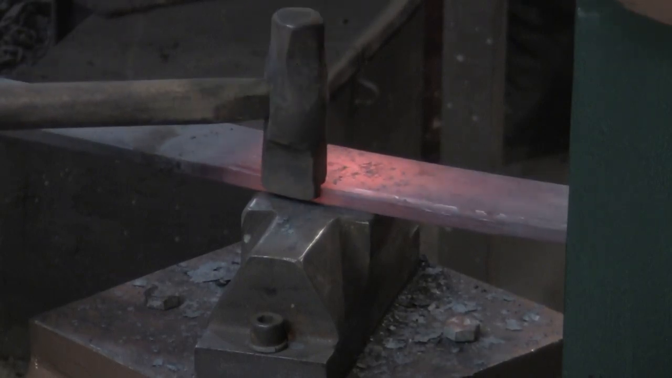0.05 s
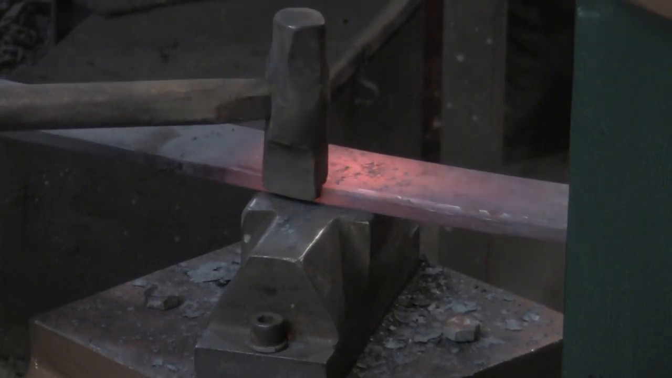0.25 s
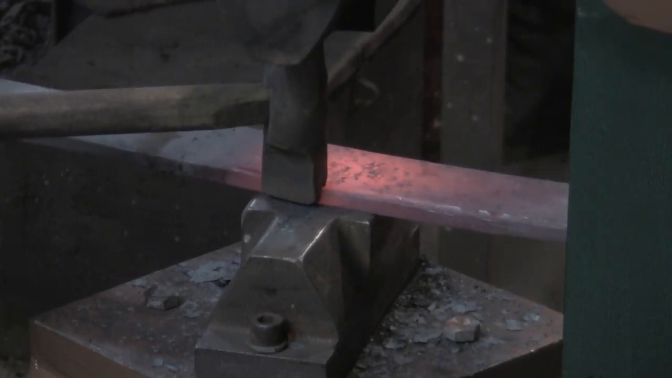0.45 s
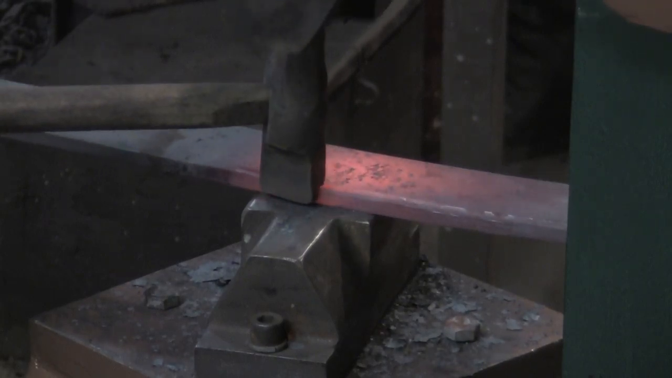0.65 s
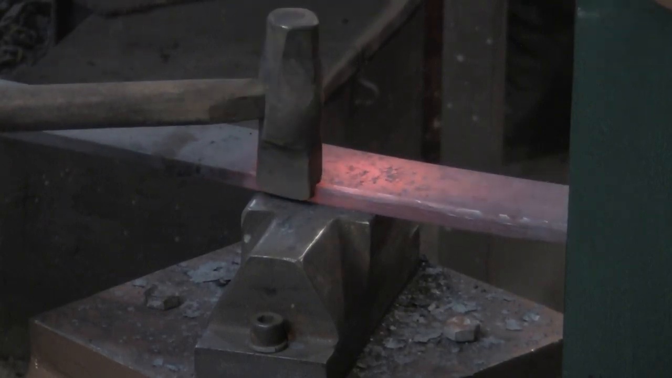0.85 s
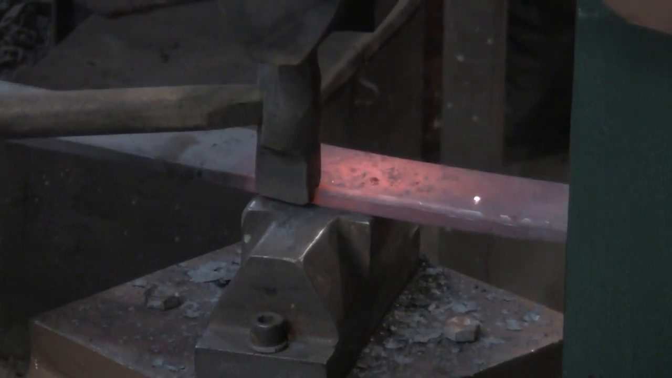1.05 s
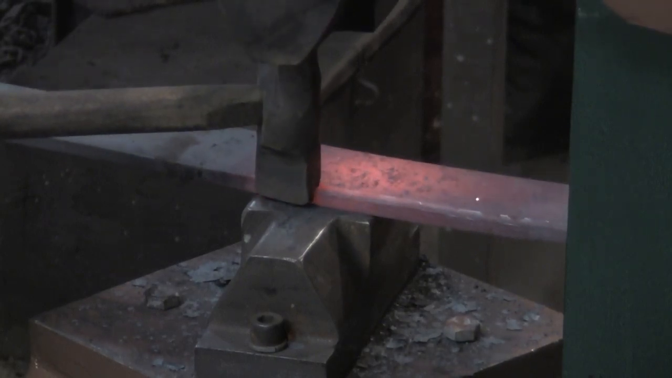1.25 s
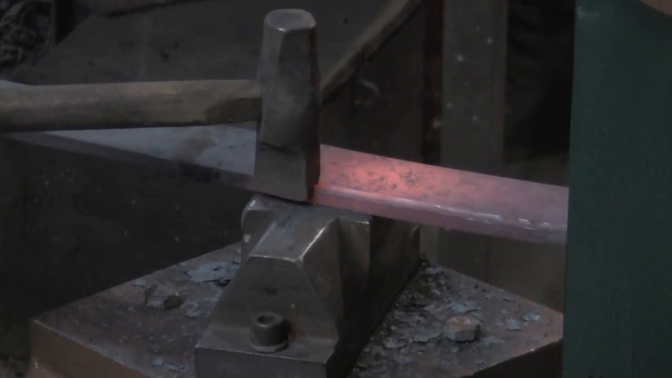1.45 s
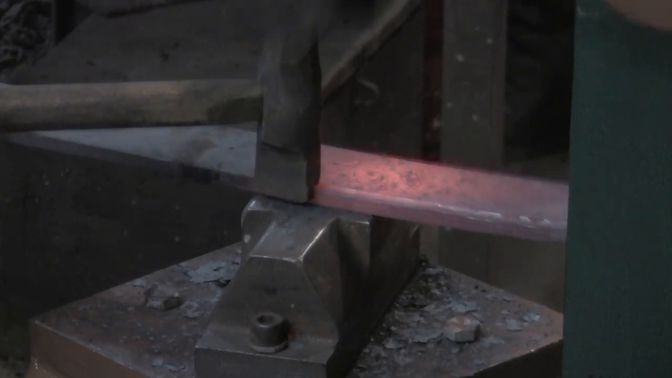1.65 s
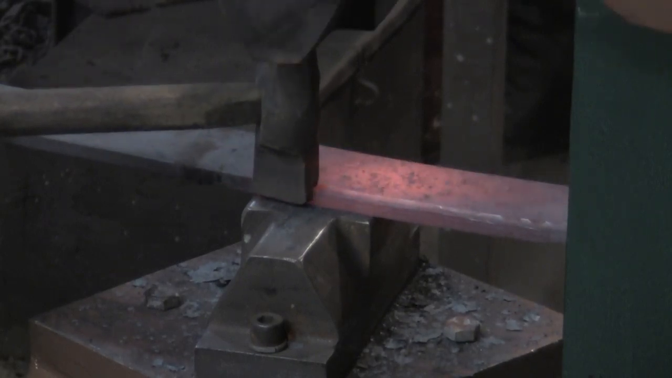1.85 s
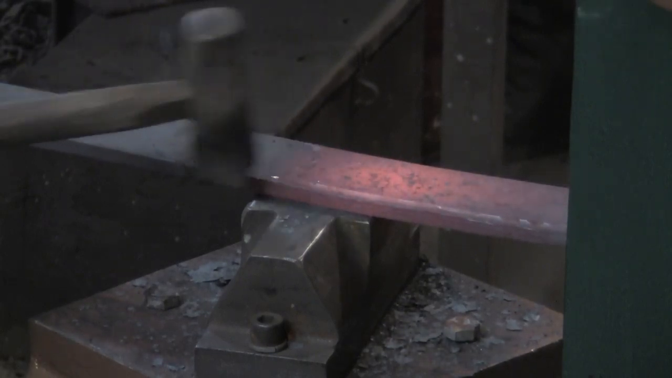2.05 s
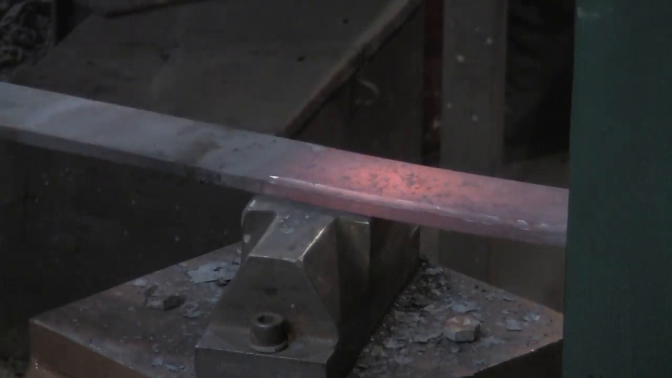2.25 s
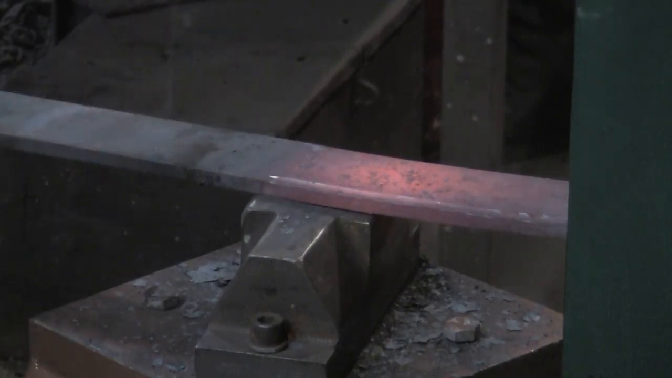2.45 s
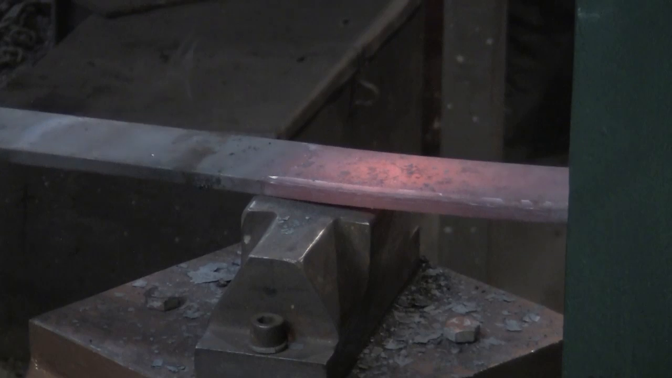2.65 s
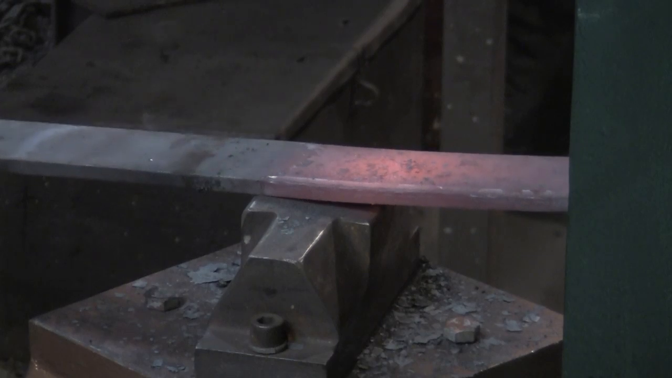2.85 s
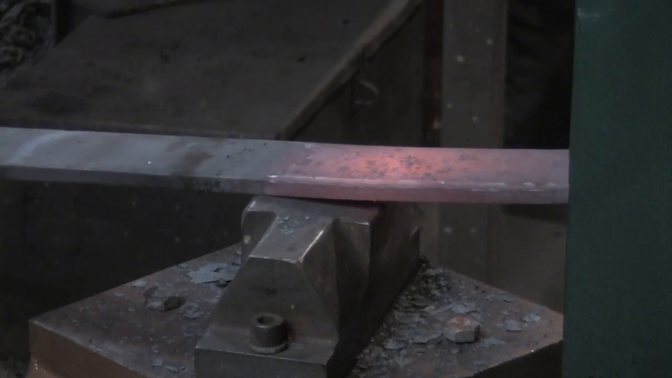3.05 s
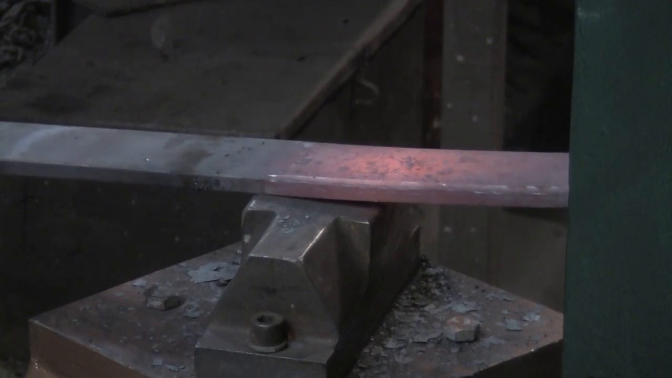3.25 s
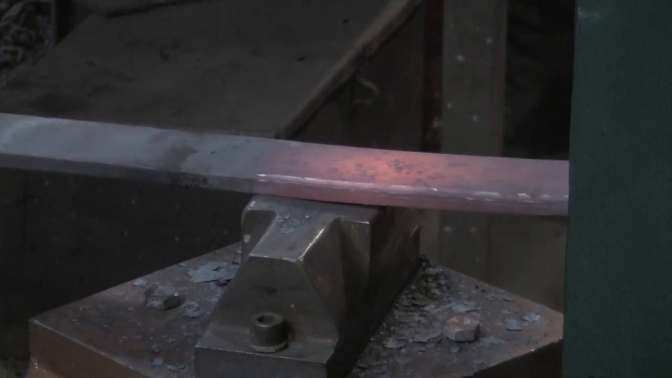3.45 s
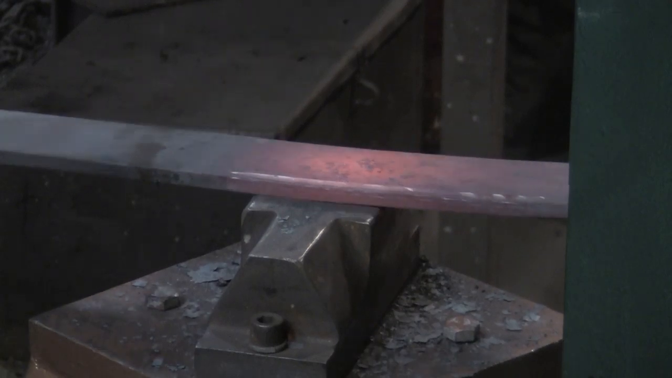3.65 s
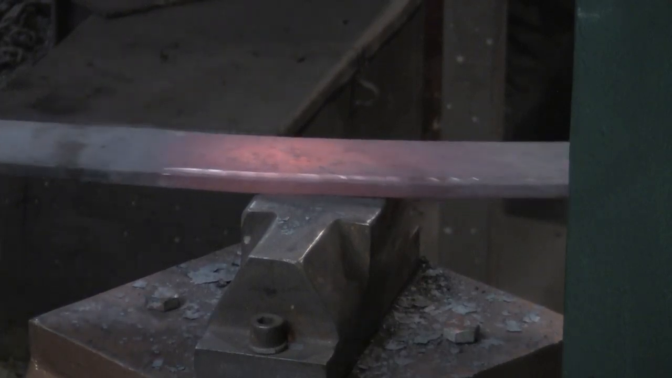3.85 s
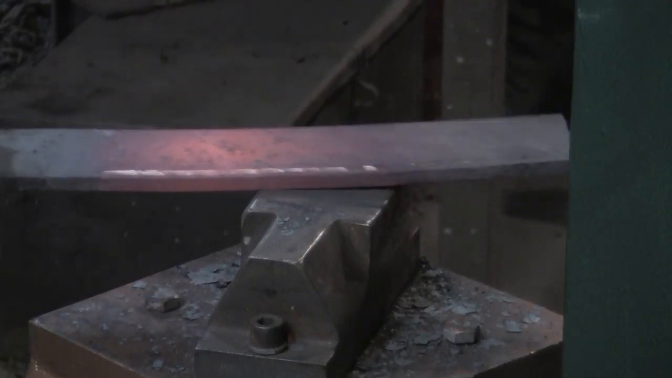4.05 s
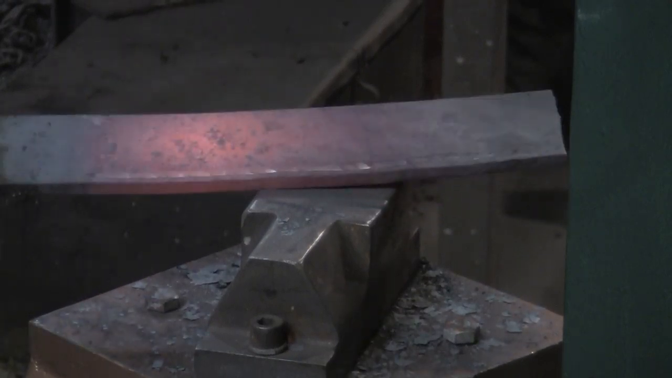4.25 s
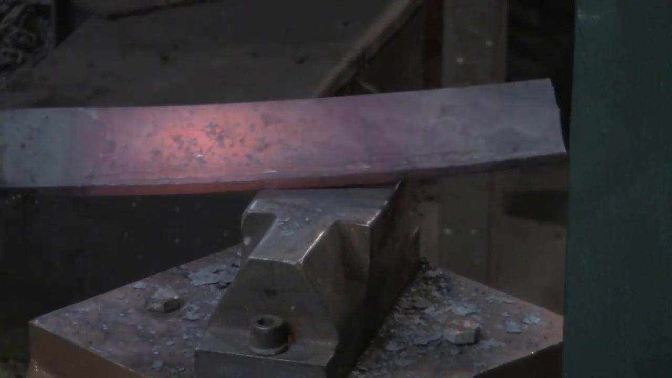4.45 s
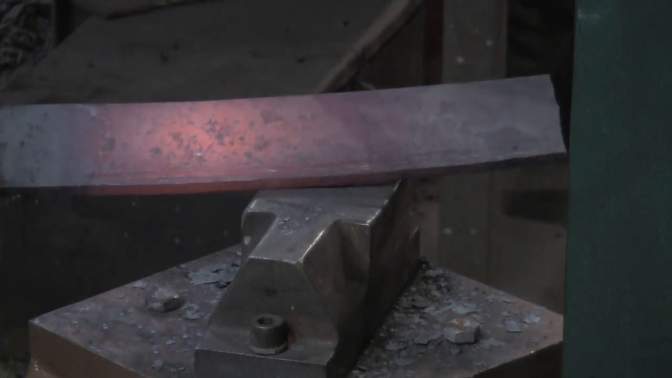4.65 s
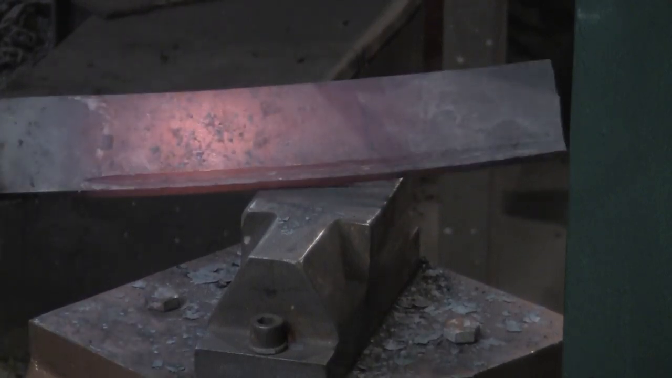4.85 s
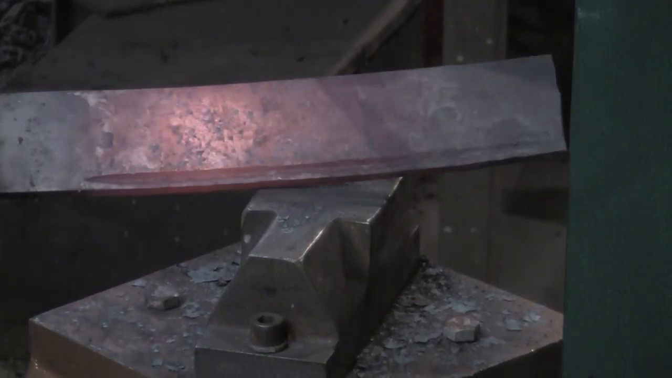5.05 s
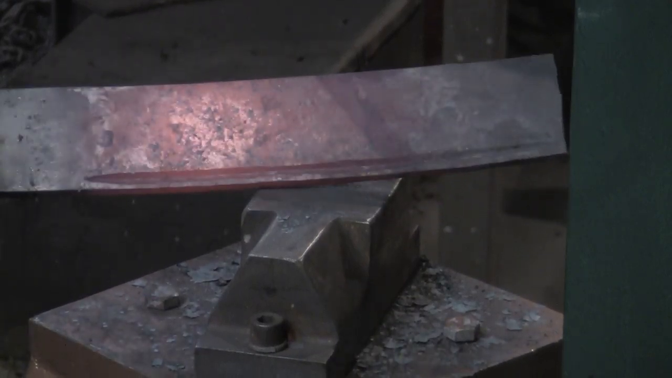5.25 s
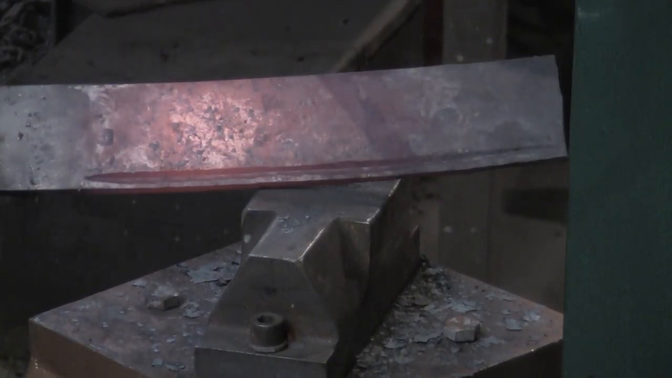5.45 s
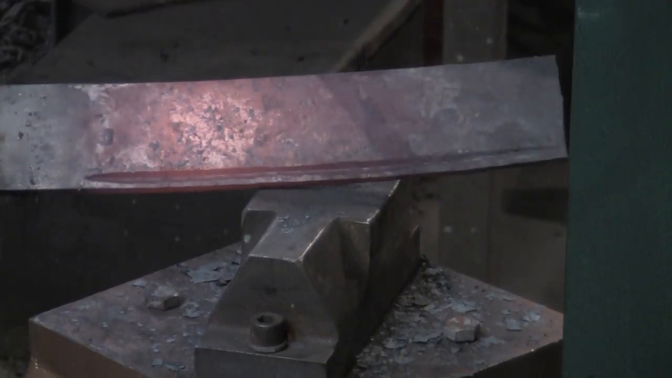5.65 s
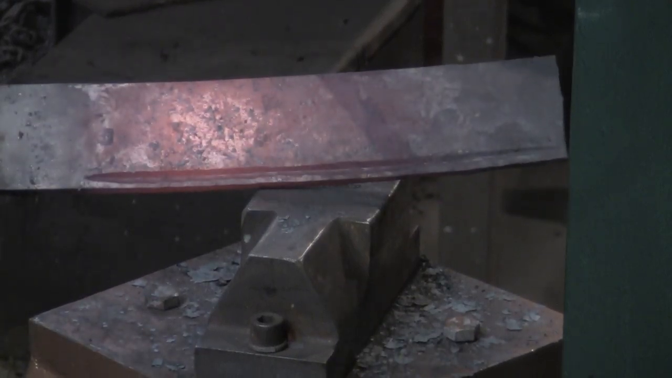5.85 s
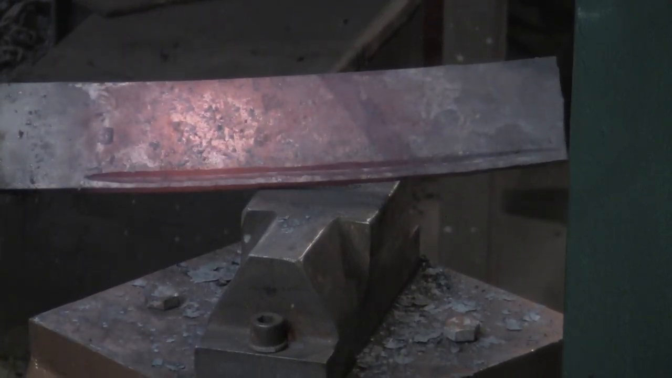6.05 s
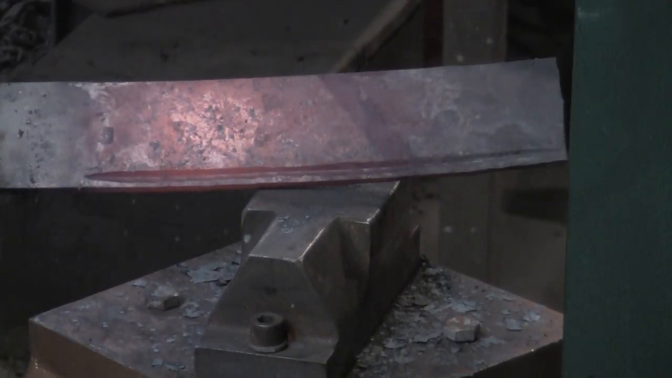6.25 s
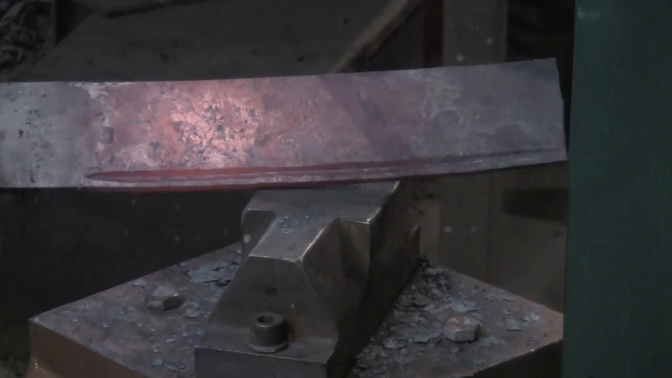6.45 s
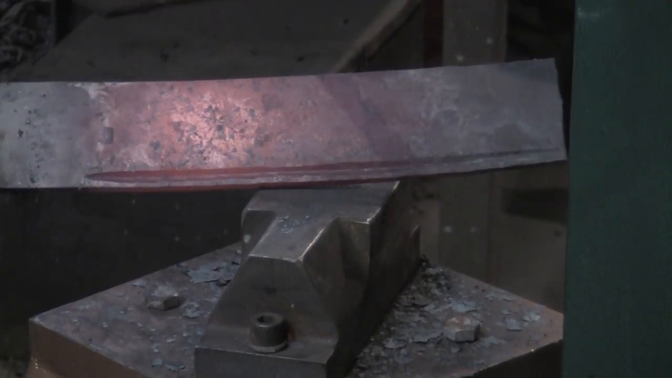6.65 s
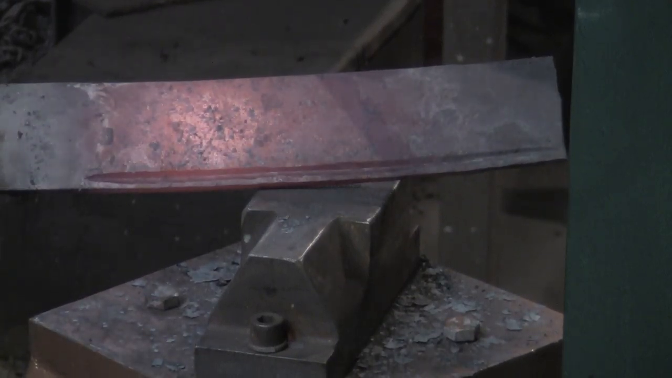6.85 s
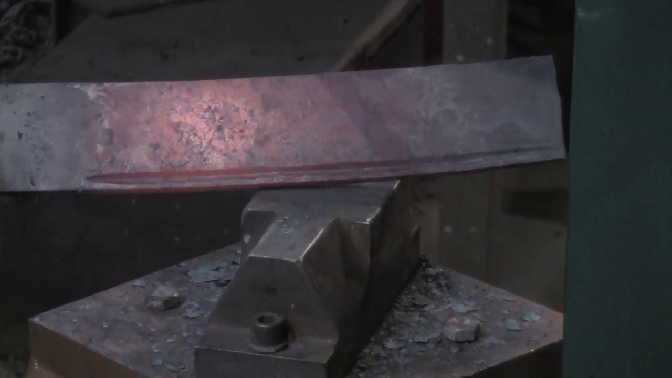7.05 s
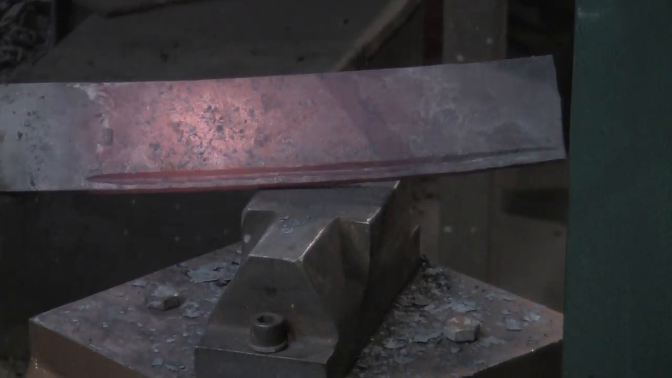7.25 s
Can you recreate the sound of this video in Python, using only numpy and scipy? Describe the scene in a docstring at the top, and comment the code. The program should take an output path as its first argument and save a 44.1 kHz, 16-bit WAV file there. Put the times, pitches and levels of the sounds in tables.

```python
"""An air hammer drives a hand-held set tool into hot steel in a large hard-walled shop: each blow is a contact
crack, a cluster of decaying modes and a noise crash; valve air, a gated noise jet, hisses around the strokes.
The tool is laid down and a steel piece clangs, with short dull rings for valve clunks, bounces and late ticks;
the bar rasps over the die as random grains excite its resonances. The walls add a diffuse echo; a forge blower
hums throughout as roar, duct and blade tone. A limiter pulls down the loud hits; the ending is faded."""
import sys
import numpy as np
from scipy import signal
from scipy.fft import rfft, irfft
from scipy.io import wavfile

SR = 44100
rng = np.random.default_rng(int(sys.argv[2]) if len(sys.argv) > 2 else 0)


def wrap_up_sound(samples):
    """Save the sound to the file named by the first command line argument, as 16-bit audio."""
    columns = np.atleast_2d(samples).T
    # keep every value between -1 and 1, then stretch to whole-number steps
    tamed = np.clip(columns, -1, 1)
    steps = np.round(tamed * 32767).astype(np.int16)
    wavfile.write(sys.argv[1], SR, steps)


N = 321930
LEAD = SR // 2   # samples computed ahead of t = 0, so that earlier sounds can still decay into the scene
LONG = N + LEAD

# All levels are relative, inside their own source.
# Ram on tool: t/s, level/dB; the first blow falls before t = 0 and only its decay is heard
RAM_BLOWS = [(-.283, 7), (0.3963, 12.5), (1.0744, 13), (1.7558, 15)]
# Modes of tool, die and frame: f/Hz, level/dB, t60/s (before the common limit)
FRAME_MODES = [(375, -17.5, 0.21), (1085, -30, 0.17), (1788, -6.5, 0.25), (1820, -16, 0.12),
               (1934, -10, 0.4), (2600, -27, 0.14), (3780, -37.5, .3)]
# Spectral density of the blow's crash: f/Hz, level/dB per Hz
BLOW_CRASH_SPECTRUM = [(120, -19), (250, -4.5), (400, -12), (820, -5), (1300, -9.5), (1850, -8),
                       (2300, -14.5), (4000, -13.5), (4800, -21.5), (9700, -24), (11200, -76),
                       (22000, -120)]
# Partials of the ram's first contact: f/Hz, level/dB, t60/s, delay/s
RAM_CONTACT_PARTIALS = [(3970, -5.5, 0.0092, 0.0003), (3870, -12, 0.016, 0.00036),
                        (5170, -2, 0.009, 0.0031), (2640, 1.5, 0.016, 0.0071), (314, 3, 0.036, 0.0022),
                        (1430, -11, 0.011, 0.00019)]
# Exhaust as the ram lifts again: t/s, level/dB at onset, held/s
EXHAUST_PUFFS = [(-.002, -8, 0.0053), (0.688, -12, 0.023), (1.365, -8.5, 0.015), (1.956, -5.5, 0.014)]
# Spectral density of the air jet: f/Hz, level/dB per Hz
AIR_SPECTRUM = [(880, -20), (1500, -15), (1890, -5.5), (2150, -12.5), (2350, -3.5), (2830, -13),
                (7160, -12.5), (9520, -8.5), (12200, -19), (13500, -39)]
# Whistles in the ports: f/Hz, width/Hz, level/dB
PORT_WHISTLES = [(8930, 110, -11.5), (9330, 99, -16), (9770, 60, -7.5), (9340, 90, -9.5), (10100, 61, -22)]
# Tool put down: t/s, level/dB
TOOL_LANDINGS = [(2.2305, 4)]
# Modes of what the tool lands on: f/Hz, level/dB, t60/s (before the common limit)
BENCH_MODES = [(757, -22, 0.25), (824, -19, 0.3), (1032, -22, 0.31), (1300, -25, 0.26), (1510, -14, 0.33),
               (1675, -19, .25), (2130, -27, 0.25), (2420, -31, 0.1)]
# Spectral density of the landing's crash: f/Hz, level/dB per Hz
BENCH_CRASH_SPECTRUM = [(180, -48), (350, -14), (750, -0.5), (1100, -3), (1600, 0.5), (2100, -9),
                        (4000, -21.5), (9400, -29), (11200, -97), (22000, -120)]
# Partials of the tool's first contact: f/Hz, level/dB, t60/s, delay/s
BENCH_CONTACT_PARTIALS = [(1522, 10, 0.033, 0.0012), (3860, -10, 0.0088, 0), (820, -3, 0.018, 0.028)]
# Steel dropped on steel: t/s, level/dB
CLANGS = [(2.8737, 7)]
# Modes of the dropped piece: f/Hz, level/dB, t60/s (before the common limit)
PIECE_MODES = [(418.7, -8.5, 0.48), (580, -18, 0.4), (676, -17, 0.61), (748, -10.5, 0.46), (902, -15, 0.55),
               (960, -24, 0.37), (1250, -9, 0.53), (1358, -14, 0.48), (1623, -7.5, 0.53), (1851, -7, 0.25),
               (2036, -12, 0.27), (2140, -13.5, 0.29), (2484, -11, 0.54), (2655, -10, 0.16),
               (2783, -11, 0.41), (2897, -8, 0.26), (3262, -23, .3), (3700, -21.5, 0.23),
               (3970, -14.5, 0.24), (7200, -37, 0.5)]
# Spectral density of the clang's crash: f/Hz, level/dB per Hz
PIECE_CRASH_SPECTRUM = [(150, -59), (250, -9), (415, -6.5), (535, -4.5), (722, -5), (1060, -3.5),
                        (2690, -12.5), (10000, -32.5), (11000, -91), (14300, -121), (22000, -120)]
# Partials of the piece's first contact: f/Hz, level/dB, t60/s, delay/s
PIECE_CONTACT_PARTIALS = [(3020, -7, 0.0089, 0.0014), (5900, -14, 0.0039, 0), (1195, 1, 0.031, 0.00066)]
# Small knocks: valve clunks, bounces of the laid tool and dropped piece, late ticks: t/s, level/dB, f/Hz
SMALL_KNOCKS = [(0.303, -15.5, 1220), (0.588, -16, 1710), (0.966, -21, 1200), (1.660, -12.5, 780),
                (1.954, -4, 217), (2.281, 3.5, 804), (2.92, -10, 416), (3.972, -49, 3900),
                (4.274, -31, 9100)]
# Resonances of the sliding bar: f/Hz, width/Hz, level/dB
BAR_RESONANCES = [(1860, 60, 6.5), (2540, 80, 2.5), (3220, 150, 6), (3930, 60, 5.5), (4710, 87, -2),
                  (5410, 61, -3), (6100, 70, -8), (6720, 70, -8), (7900, 150, -3), (8880, 90, -1),
                  (9700, 150, -8.5)]
# Reverberation time of the shop: f/Hz, t60/s
SHOP_DECAY = [(100, 0.5), (500, 0.81), (2000, 0.84), (5000, 0.61), (10000, 0.23)]
# Stereo width of echo and blower: f/Hz, level/dB of side over mid
SIDE_OVER_MID = [(60, -30), (180, -20), (520, -15.5), (1520, -15), (4470, -10), (13200, -1)]
# Spectral density of the blower's roar: f/Hz, level/dB per Hz
ROAR_SPECTRUM = [(40, -64.5), (60, -16), (113, -17.5), (200, -12.5), (313, -19.5), (389, -12.5), (587, -16),
                 (762, -16), (990, -18.5), (1230, -26.5), (1430, -20.5), (2600, -36.5), (9900, -52.5),
                 (11200, -86.5), (14000, -100)]
# Resonances of the blower duct: f/Hz, width/Hz, level/dB
DUCT_RESONANCES = [(84, 8, -32), (121.3, 4.5, -8), (140.5, 15, -35), (402.2, 14.4, -7.5), (590.3, 13, -6.5),
                   (1477, 39, -24.5)]
# Course of the blade tone: t/s, f/Hz, level/dB
BLADE_COURSE = [(0, 221.8, 3), (3.7, 219.6, 1), (4.4, 218, 5.5), (7.3, 219, 3.5)]

LONGEST_RING_S = .44   # longest t60 that any mode may have
SWELL_CYCLES = 4.1     # time constant of a mode's build-up, in its own cycles
CONTACT_ECHO_DB = -9.5   # the crack is beamed at the microphone; the walls get less of it

# Valve air, timed back from each blow: a faint leak as the treadle moves, then the drive jet, shut off at impact
LEAK_AHEAD_S, LEAK_DB, LEAK_RISE_DB_PER_S, LEAK_FALL_DB_PER_S = .112, -37, 449.5, 213.5
DRIVE_AHEAD_S, DRIVE_DB = .042, -24
DRIVE_RISE_DB_PER_S, DRIVE_CLIMB_DB_PER_S, DRIVE_FALL_DB_PER_S = 1398.5, 94.5, 1500
EXHAUST_RISE_DB_PER_S, EXHAUST_CLIMB_DB_PER_S, EXHAUST_FALL_DB_PER_S = 501, 152, 1203

# Bar dragged over the die: sets in, presses harder, eases off
SLIDE_S, SLIDE_DB, SLIDE_HELD_S = 3.76, -50, 0.15
SLIDE_RISE_DB_PER_S, SLIDE_CLIMB_DB_PER_S, SLIDE_FALL_DB_PER_S = 48, 40, 55
GRAINS_PER_S = 2500

SHOP_DB, SHOP_BUILD_S = -4.5, 0.011
BLOWER_DB, BLADE_WAVER_DB, BLADE_WAVER_HZ, BLOWER_FLUTTER_DB = -34, 0.06, 0.24, 0.56

MIC_LOW_HZ, COUPLING_HZ, CUTOFF_HZ = 71.6, 60, 13600
LIMIT_DB, LIMIT_WINDOW_S, LIMIT_RELEASE_DB_PER_S, LIMIT_ATTACK_S = -11, 0.0064, 82.5, 0.00057
CLIP = 1.02   # amplitude that overload approaches
OUTPUT_DB, FADE_FROM_S, FADE_DB_PER_S = -3, 6.82, 8


def from_db(db):
    """Level definition: decibels to amplitude gain."""
    return 10 ** (np.asarray(db) / 20)


def rms_one(x):
    """Power normalisation: scale to rms 1."""
    return x / np.sqrt(np.mean(x ** 2) + 1e-20)


def at_hz(points, hz):
    """Interpolation along log frequency: the table's second column at the given frequencies."""
    table = np.array(points)
    return np.interp(np.log(hz), np.log(table[:, 0]), table[:, 1])


def bin_hz(size):
    """Discrete spectrum: bin frequencies, shifted by 1 Hz to keep the logarithm finite."""
    return np.arange(size // 2 + 1) * SR / size + 1


def coloured(x, spectrum):
    """Linear filtering: weight each frequency of a signal by a table of levels."""
    size = len(x)
    return irfft(rfft(x) * from_db(at_hz(spectrum, bin_hz(size))), size)


def noise(spectrum, size):
    """Random process: noise of the given spectral density, rms 1."""
    return rms_one(coloured(rng.standard_normal(size), spectrum))


def resonant(x, peaks):
    """Forced resonance: parallel two-pole resonators, each scaled to its own rms level."""
    out = 0
    for hz, width, level_db in peaks:
        r = np.exp(-np.pi * width / SR)
        poles = [1, -2 * r * np.cos(2 * np.pi * hz / SR), r * r]
        out = out + from_db(level_db) * rms_one(signal.lfilter([1, 0, -1], poles, x))
    return out


def swell(s, level_db, rise, held_s=0, climb=0, fall=0):
    """Exponential envelope: rises to its level at time s, climbs while held, then falls; slopes in dB/s."""
    since = (np.arange(LONG) - LEAD) / SR - s
    slopes = [rise * since, climb * since, climb * held_s - fall * (since - held_s)]
    return from_db(level_db + np.minimum.reduce(slopes))


def drift(rate):
    """Slow random modulation: noise below about the given rate in Hz, rms 1."""
    r = np.exp(-2 * np.pi * rate / SR)
    slow = signal.lfilter([1], [1, -2 * r, r * r], rng.standard_normal(N + SR))
    return rms_one(slow[SR:])   # the first second lets the filter settle


def widen(mid, other):
    """Decorrelation: an unrelated signal, coloured by the width table, is added left and subtracted right."""
    side = coloured(other, SIDE_OVER_MID)
    return np.array([mid + side, mid - side])


def add(track, s, sound):
    """Superposition: mix a sound in at time s."""
    i = LEAD + round(s * SR)
    track[i:i + len(sound)] += sound[:LONG - i]


def crash_burst(spectrum, t, t60):
    """Dense modal overlap: a dying noise burst whose phases are random and whose spectrum is the table's."""
    shape = from_db(-60 * t / t60) * (1 - np.exp(-t / 0.0057))
    bins = rfft(shape * rng.standard_normal(len(t)))
    even = irfft(bins / np.abs(bins) * from_db(at_hz(spectrum, bin_hz(len(t)))), len(t))
    return rms_one(even * np.sqrt(shape)) * np.sqrt(np.mean(shape ** 2))


def struck(hits, modes, split, crash, crash_db, crash_t60):
    """Modal superposition: each strong mode rings as beating twins; the many faint ones merge into a crash."""
    out, t = np.zeros(LONG), np.arange(SR) / SR
    hz, level_db, t60 = np.transpose(modes)[:, :, None]
    t60 = np.minimum(t60, LONGEST_RING_S)
    build_up = 1 - np.exp(-t * hz / SWELL_CYCLES)   # low modes come late
    envelope = from_db(level_db - 60 * t / t60) * build_up
    for s, strength_db in hits:
        # split: half the spread of nine twins, as a share of the mode's frequency
        spread = np.linspace(-1, 1, num=9)[:, None, None] + rng.uniform(-.12, 0.085, (9, len(hz), 1))
        twins = hz * (1 + split * spread)
        swing = np.sin(2 * np.pi * (twins * t + rng.random(twins.shape))).sum(axis=0) / np.sqrt(len(twins))
        burst = from_db(crash_db) * crash_burst(crash, t, crash_t60)
        add(out, s, from_db(strength_db) * ((envelope * swing).sum(axis=0) + burst))
    return out


def contact(hits, partials):
    """Impact transient: short delayed rings at the start of each hit, slightly detuned every time."""
    out, t = np.zeros(LONG), np.arange(SR // 10) / SR
    for s, strength_db in hits:
        for hz, level_db, t60, delay_s in partials:
            detuned_hz = hz * (1 + .02 * rng.standard_normal())
            ring = np.sin(2 * np.pi * detuned_hz * t) * (1 - np.exp(-4 * t * hz))
            add(out, s + delay_s, from_db(strength_db + level_db - 60 * t / t60) * ring)
    return out


def hammer_blows():
    """Impact excitation: the ram sets tool, die and frame ringing; returns body and contact crack."""
    body = struck(RAM_BLOWS, FRAME_MODES, 0.006, BLOW_CRASH_SPECTRUM, crash_db=2.0, crash_t60=0.13)
    return body, contact(RAM_BLOWS, RAM_CONTACT_PARTIALS)


def valve_air():
    """Turbulent jet noise: a bright hiss with faint port whistles, gated by the valve."""
    jet = noise(AIR_SPECTRUM, LONG) + resonant(rng.standard_normal(LONG), PORT_WHISTLES)
    valve = np.zeros(LONG)
    for s, _ in RAM_BLOWS:
        valve += swell(s - LEAK_AHEAD_S, LEAK_DB, LEAK_RISE_DB_PER_S, fall=LEAK_FALL_DB_PER_S)
        valve += swell(s - DRIVE_AHEAD_S, DRIVE_DB, DRIVE_RISE_DB_PER_S,
                       DRIVE_AHEAD_S, DRIVE_CLIMB_DB_PER_S, DRIVE_FALL_DB_PER_S)
    for s, level_db, held_s in EXHAUST_PUFFS:
        valve += swell(s, level_db, EXHAUST_RISE_DB_PER_S,
                       held_s, EXHAUST_CLIMB_DB_PER_S, EXHAUST_FALL_DB_PER_S)
    return rms_one(jet) * valve


def tool_laid_down():
    """Impact excitation: the tool rings what it lands on; returns body and contact crack."""
    body = struck(TOOL_LANDINGS, BENCH_MODES, 0.009, BENCH_CRASH_SPECTRUM, crash_db=6.0, crash_t60=0.09)
    return body, contact(TOOL_LANDINGS, BENCH_CONTACT_PARTIALS)


def steel_clang():
    """Impact excitation: the dropped piece rings in its many modes; returns body and contact crack."""
    body = struck(CLANGS, PIECE_MODES, 0.0019, PIECE_CRASH_SPECTRUM, crash_db=-4.0, crash_t60=0.41)
    return body, contact(CLANGS, PIECE_CONTACT_PARTIALS)


def knocks():
    """Heavily damped vibration: short dull rings with a rough noise edge."""
    out, t = np.zeros(LONG), np.arange(SR // 10) / SR
    for s, strength_db, hz in SMALL_KNOCKS:
        edge = 0.099 * rng.standard_normal(len(t)) * from_db(-60 * t / 0.0035)
        ring = np.sin(2 * np.pi * hz * t) + edge
        t60 = min(.04, 18.0 / hz)   # at most 18 cycles
        add(out, s, from_db(strength_db - 60 * t / t60) * ring)
    return out


def slide():
    """Friction excitation: scale grains catch unevenly, giving a dry rasp and ringing the die-damped bar."""
    grains = (rng.random(LONG) < GRAINS_PER_S / SR) * rng.standard_normal(LONG) + 1e-18
    rasp = resonant(grains, [(4000, 5000, -10)])
    ringing = rms_one(resonant(grains, BAR_RESONANCES))
    pressure = swell(SLIDE_S, SLIDE_DB, SLIDE_RISE_DB_PER_S,
                     SLIDE_HELD_S, SLIDE_CLIMB_DB_PER_S, SLIDE_FALL_DB_PER_S)
    return (ringing + rasp) * pressure


def shop(x):
    """Diffuse-field reverberation: half-octave noise bands build up together and die at their own rates."""
    t, edges = np.arange(3 * SR // 2) / SR, 60 * 2 ** np.arange(0, 8.6, .5)
    white, tail = rng.standard_normal((2, 2, len(t))), 0
    for k, (low, high) in enumerate(zip(edges, edges[1:])):
        band_filter = signal.butter(2, [low, high], "band", fs=SR, output="sos")
        band = signal.sosfilt(band_filter, white[k % 2])   # neighbouring bands use separate noise
        tail = tail + band * from_db(-60 * t / at_hz(SHOP_DECAY, np.sqrt(low * high)))
    tail = tail * (1 - np.exp(-t / SHOP_BUILD_S))
    tail = widen(*tail) / np.sqrt(np.sum(tail[0] ** 2))   # mid of unit energy
    return from_db(SHOP_DB) * signal.fftconvolve(x[None], tail, axes=1)[:, :LONG]


def blower():
    """Fan noise: broad turbulent roar, duct resonances and a wavering blade tone."""
    mid, other = (noise(ROAR_SPECTRUM, N) + resonant(rng.standard_normal(N), DUCT_RESONANCES)
                  for _ in range(2))
    s, hz, level_db = np.transpose(BLADE_COURSE)
    t = np.arange(N) / SR
    blade_hz = np.interp(t, s, hz) + BLADE_WAVER_HZ * drift(0.98)
    blade_db = np.interp(t, s, level_db) + BLADE_WAVER_DB * drift(2.1)
    tone = from_db(blade_db) * np.sin(2 * np.pi * np.cumsum(blade_hz) / SR)
    rush = widen(mid, other) * from_db(BLOWER_FLUTTER_DB * drift(14.0))
    return from_db(BLOWER_DB) * (rush + tone * from_db([[.6], [-.6]]))   # tone a little to the left


def scene():
    """Superposition of direct and reverberant fields: near sources with their echo, over the blower."""
    ram, ram_crack = hammer_blows()
    tool, tool_crack = tool_laid_down()
    piece, piece_crack = steel_clang()
    cracks = ram_crack + tool_crack + piece_crack
    bodies = ram + valve_air() + tool + piece + knocks() + slide()
    echo = shop(bodies + from_db(CONTACT_ECHO_DB) * cracks)
    near = (bodies + cracks + echo) * from_db([[-.4], [.4]])   # the hammer stands a little to the right
    return near[:, LEAD:] + blower()


def record(dry):
    """Gain control: bass-shy microphone, slightly late limiter, overload on what slips past, fade, top cut."""
    dry = signal.sosfilt(signal.butter(3, MIC_LOW_HZ, "high", fs=SR, output="sos"), dry)
    t = np.arange(N) / SR
    r, a = np.exp(-1 / (LIMIT_WINDOW_S * SR)), np.exp(-1 / (LIMIT_ATTACK_S * SR))
    power = signal.lfilter([1 - r], [1, -r], np.mean(dry ** 2, axis=0))
    level_db = 10 * np.log10(power + 1e-12)
    ramp = LIMIT_RELEASE_DB_PER_S * t
    held_db = np.maximum.accumulate(level_db + ramp) - ramp   # falls no faster than the release
    cut_db = signal.lfilter([1 - a], [1, -a], np.maximum(held_db - LIMIT_DB, 0))
    limited = dry * from_db(-cut_db)
    overloaded = limited / (1 + (limited / CLIP) ** 4) ** .25
    faded = overloaded * from_db(OUTPUT_DB - FADE_DB_PER_S * np.maximum(t - FADE_FROM_S, 0))
    coupled = signal.sosfilt(signal.butter(1, COUPLING_HZ, "high", fs=SR, output="sos"), faded)
    return signal.sosfilt(signal.cheby2(12, 70, CUTOFF_HZ, fs=SR, output="sos"), coupled)


dry = scene()
out = record(dry)
wrap_up_sound(out)
```